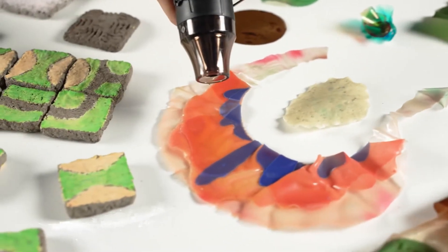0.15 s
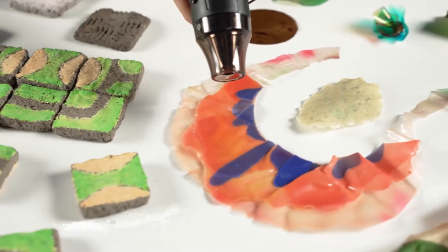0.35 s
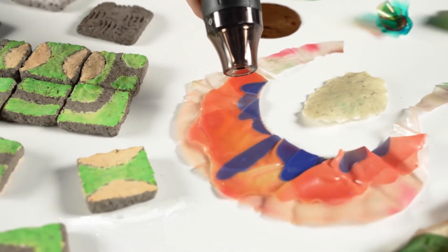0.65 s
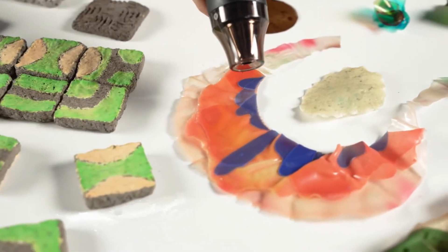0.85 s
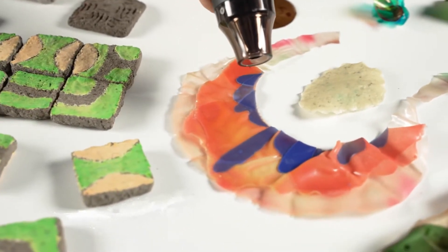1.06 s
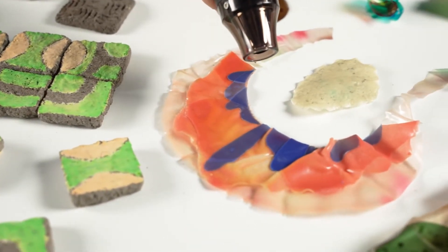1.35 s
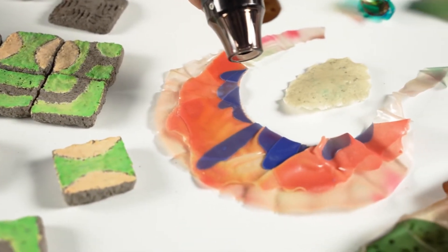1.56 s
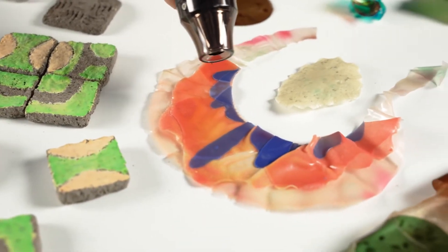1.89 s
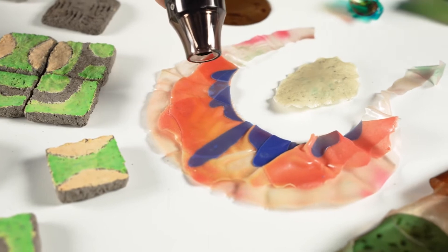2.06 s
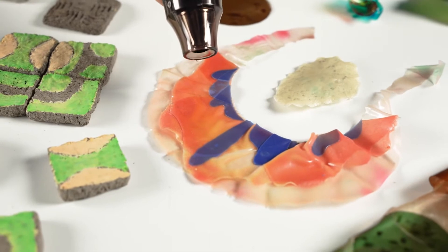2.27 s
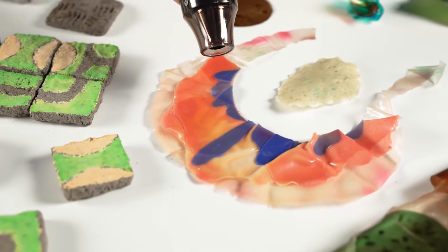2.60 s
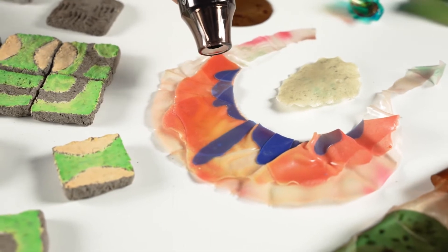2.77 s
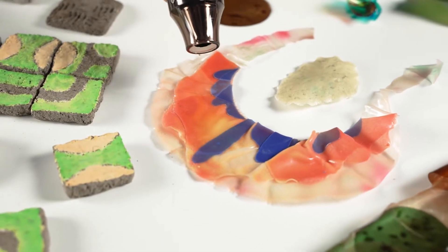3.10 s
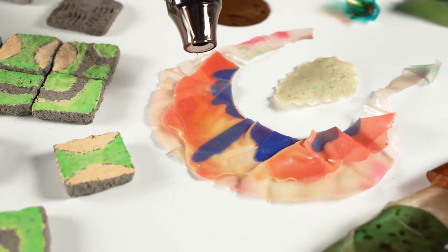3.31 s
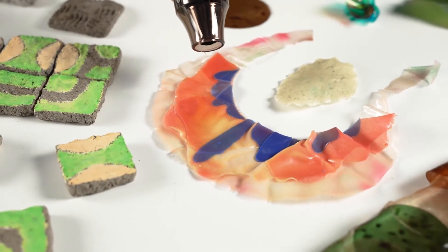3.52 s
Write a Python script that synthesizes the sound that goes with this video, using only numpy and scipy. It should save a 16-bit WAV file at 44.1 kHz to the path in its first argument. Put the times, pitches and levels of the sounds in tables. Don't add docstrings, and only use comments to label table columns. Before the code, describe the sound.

A handheld heat gun blows steady hissing hot air with a constant high fan-motor whine.

```python
import sys
import numpy as np
from scipy import signal
from scipy.fft import rfft, irfft, next_fast_len
from scipy.io import wavfile

SR = 44100
rng = np.random.default_rng(int(sys.argv[2]) if len(sys.argv) > 2 else 0)


def store_wav(level_fs):
    pcm = np.round(np.clip(np.atleast_2d(level_fs), -1, 1) * 32767)
    wavfile.write(sys.argv[1], SR, pcm.T.astype(np.int16))


def convert_level_to_amplitude(level_db):
    exponent = np.asarray(level_db, float) / 20
    return 10 ** exponent


N = 160965

# time [s], level [dB], turned away [0-1], tipped over [0-1].
AIR_AND_AIM = [(0, -44, 0.14, 0), (.4, -44.5, 0.07, 0.05), (.75, -44.5, 0.37, 0.35), (1.0, -44, 0.48, 0.73),
               (1.4, -45, 0.48, 0.96), (1.8, -45.5, 0.46, 0.66), (2.2, -45, 0.54, 0), (2.4, -45.5, .7, 0.5),
               (2.7, -46, 0.62, 0.2), (3.2, -47, 0.63, .05), (3.65, -46.5, 1, 0.35)]
# time [s], shaft rate [Hz].
SHAFT_SPEED = [(0, 289.8), (.3, 290.5), (.85, 291.7), (1.1, 291.7), (1.4, 291.45), (1.95, 291.6),
               (2.3, 292.55), (2.52, 291.85), (2.7, 292.7), (3.0, 293.35), (3.2, 293.2), (3.55, 294.0),
               (3.65, 294.0)]


def rms_one(x):
    return x / np.sqrt(np.mean(x ** 2) + 1e-20)


def in_time(rows):
    time_s, *columns = np.transpose(rows)
    return [np.interp(np.arange(N) / SR, time_s, column) for column in columns]


def slope_db(points, hz, edge_db=-200):
    point_hz, point_db = np.transpose(points)
    return np.interp(np.log(hz + 1), np.log(point_hz), point_db, left=edge_db, right=edge_db)


def peaks_db(rows, hz):
    return sum(db / (1 + (2 * (hz - centre_hz) / width_hz) ** 2) for centre_hz, width_hz, db in rows)


def drift(rate_hz):
    hop, settle = 40, 4000
    pole = np.exp(-2 * np.pi * rate_hz * hop / SR)
    noise = rng.standard_normal(N // hop + settle + 2)
    slow = signal.lfilter([1], [1, -2 * pole, pole ** 2], noise)[settle:]
    return np.interp(np.arange(N) / hop, np.arange(len(slow)), rms_one(slow - slow.mean()))


def aim_db(hz):
    # frequency [Hz], change [dB].
    turned = [(500, 3.16), (1050, -5.5), (1400, 0), (1800, -.5), (3100, -2.5), (5400, -5), (8500, -.7),
              (12000, -1.5)]
    # frequency [Hz], width [Hz], change [dB].
    tipped = [(1010, 340, 2), (1500, 200, -3.5), (1750, 100, 1), (2610, 58, 7), (2900, 300, -1.5),
              (3700, 400, 3), (4760, 840, 5), (5600, 220, 7.5), (6300, 200, 1.5), (11800, 1000, -0.5)]
    held = [(10, turned[0][1]), *turned, (SR, turned[-1][1])]
    return slope_db(held, hz), peaks_db(tipped, hz)


def fan(shaft_angle):
    order_levels = [-82, -65, -66, -65.5, -47, -71, -71, -91, -75, -75, -82, -87, -88, -83, -83, -91, -80,
                    -94, -79, -81, -81, -73, -96, -88, -82, -104, -103, -87, -92, -89, -93, -91, -98, -85,
                    -91, -106, -104, -109, -102, -106, -104, -102, -109, -107, -100, -107, -107, -107, -105,
                    -101]
    # time [s], blade tone level [dB].
    blade_tone = [(0, -43.5), (.3, -47), (.6, -47), (.85, -48), (1.1, -48), (1.4, -48.5), (1.7, -48.5),
                  (2.0, -49), (2.25, -47), (2.55, -48.5), (2.8, -46.5), (3.1, -45), (3.4, -45.5),
                  (3.65, -46)]
    blades = 5
    trim_db, rise_db_per_order = -0.5, 0.02
    blade_level_db, = in_time(blade_tone)
    _, turn, tip = in_time(AIR_AND_AIM)
    out = np.zeros(N)
    for order, order_db in enumerate(order_levels, start=1):
        if order == blades:
            level_db = blade_level_db + 0.6 * drift(14)
        else:
            turned_db, tipped_db = aim_db(order * SHAFT_SPEED[0][1])
            level_db = order_db + trim_db + rise_db_per_order * order
            level_db = level_db + 1.2 * drift(0.9) + 1.5 * drift(8)
            level_db += turned_db * (turn - turn.mean()) + tipped_db * (tip - tip.mean())
        phase = rng.uniform(0, 2 * np.pi)
        out += np.sqrt(2) * convert_level_to_amplitude(level_db) * np.sin(order * shaft_angle + phase)
    return out


def room(x):
    t60_s, wall_db, wall_cut_hz = 0.35, -15, 3500
    t = np.arange(SR // 2) / SR
    tail = rng.standard_normal(len(t)) * convert_level_to_amplitude(-60 * t / t60_s) * (t > 0.004)
    tail /= np.sqrt(np.sum(tail ** 2))
    tail = signal.lfilter(*signal.butter(1, wall_cut_hz, fs=SR), tail)
    return x + convert_level_to_amplitude(wall_db) * signal.fftconvolve(x, tail)[:len(x)]


def air(shaft_angle):
    # frequency [Hz], density [dB per Hz].
    rush = [(200, -29.5), (300, -13), (420, -2.5), (1000, -1), (1900, -2), (2200, -9), (3200, -12),
            (4200, -28.5)]
    hiss = [(2500, -32), (4200, -24.5), (5000, -18.5), (6800, -18.5), (8200, -22), (9500, -31),
            (12200, -31), (16000, -38)]
    # frequency [Hz], width [Hz], gain [dB].
    housing = [(458, 54, 1.5), (510, 74, 3), (600, 108, 3), (699, 99, 5), (870, 41, -8), (947, 27, 3.5),
               (1118, 68, -6.5), (1390, 240, 4), (1565, 28, -3.5), (1744, 54, 3), (1846, 54, 3.5),
               (1970, 46, -8), (2102, 42, -6), (3050, 200, 3.5)]
    nozzle = [(4900, 160, 1), (5490, 240, 5), (5670, 210, -7), (6080, 120, 0.5), (6290, 190, 5),
              (7250, 140, -3.5), (7450, 150, -0.5), (8800, 160, -2.5), (9300, 120, 6.5), (10000, 97, 5),
              (10200, 120, 4), (11650, 540, 1), (14650, 200, -10), (15450, 100, 6)]
    patchy_db, hiss_throb, trim_db = 0.45, 0.07, 9.5
    flow_db, turn, tip = in_time(AIR_AND_AIM)
    turn, tip = np.clip(turn, 0, 1), np.clip(tip, 0, 1)
    size = next_fast_len(N + SR)
    hz = np.arange(size // 2 + 1) * SR / size
    away, over = convert_level_to_amplitude(aim_db(hz))
    out = np.zeros(N)
    for slope, body, throb in ((rush, housing, 0), (hiss, nozzle, hiss_throb)):
        noise = rfft(room(rng.standard_normal(size)))
        noise = noise * convert_level_to_amplitude(slope_db(slope, hz) + peaks_db(body, hz))
        colours = (1, away, over, away * over)
        straight, turned, tipped, both = (irfft(noise * gain, size)[-N:] for gain in colours)
        upright = straight + turn * (turned - straight)
        tilted = tipped + turn * (both - tipped)
        swell = convert_level_to_amplitude(patchy_db * drift(1.02)) * (1 + throb * np.sin(shaft_angle))
        out += swell * ((1 - tip) * upright + tip * tilted)
    return convert_level_to_amplitude(flow_db + trim_db) * out


def room_floor():
    # frequency [Hz], density [dB per Hz].
    rumble_slope = [(12, -32), (20, -3), (86, -11), (113, -8.5), (167, -9), (250, -5), (320, -29),
                    (550, -120)]
    rumble_db, hum_hz, hum_db = -73, 120, -81
    hz = np.arange(N // 2 + 1) * SR / N
    noise = rfft(rng.standard_normal(N))
    rumble = rms_one(irfft(noise * convert_level_to_amplitude(slope_db(rumble_slope, hz)), N))
    hum = np.sin(2 * np.pi * hum_hz * np.arange(N) / SR)
    return convert_level_to_amplitude(rumble_db) * rumble + convert_level_to_amplitude(hum_db + 3.3 * drift(0.5)) * hum


def scene():
    speed_hz, = in_time(SHAFT_SPEED)
    jitter_hz = 0.06 * drift(14)
    shaft_angle = 2 * np.pi * np.cumsum(speed_hz + jitter_hz) / SR
    return (fan(shaft_angle) + air(shaft_angle) + room_floor())[None]


def roll_off(x):
    return signal.sosfilt(signal.butter(12, 15870, fs=SR, output="sos"), x)


def record(dry):
    cutoff_hz = 15740
    hz = np.arange(N // 2 + 1) * SR / N
    mix = irfft(rfft(dry) * (hz < cutoff_hz), N)
    return roll_off(mix)


dry = scene()
out = record(dry)
store_wav(out)
```